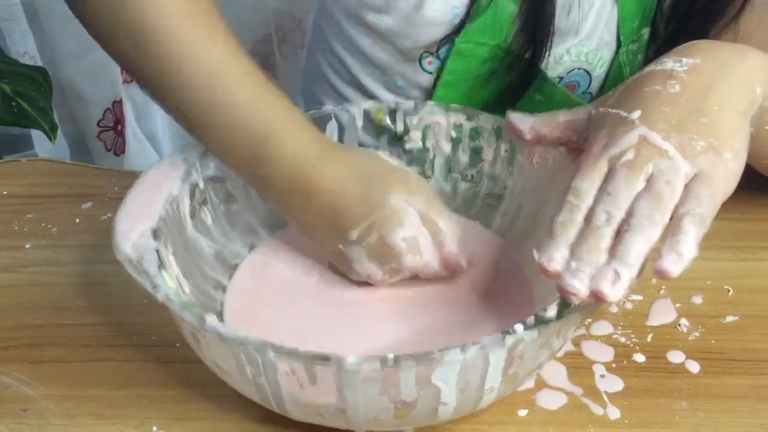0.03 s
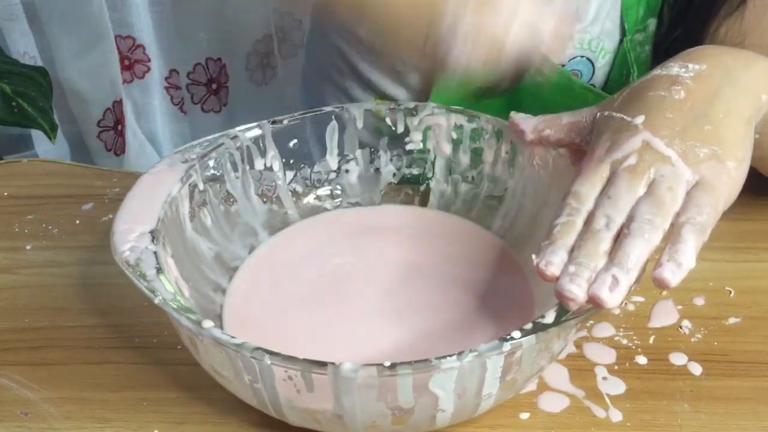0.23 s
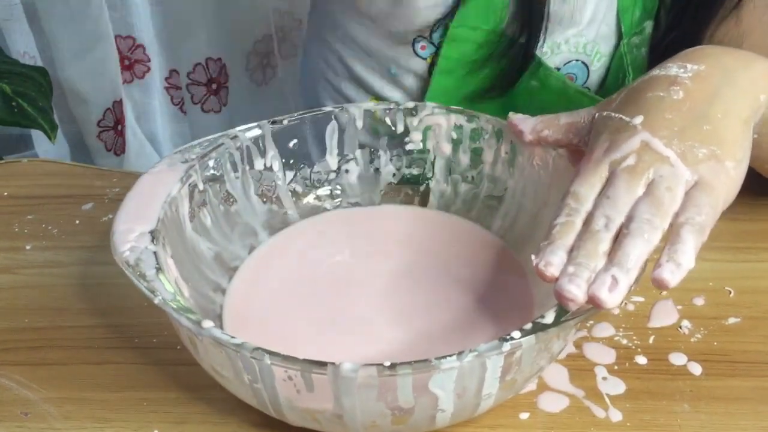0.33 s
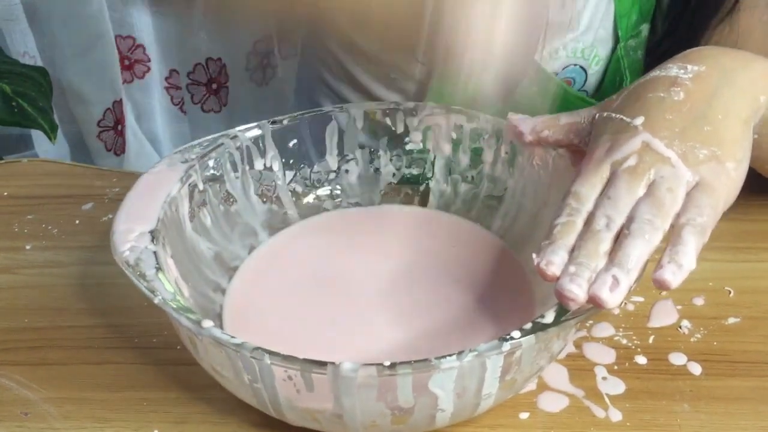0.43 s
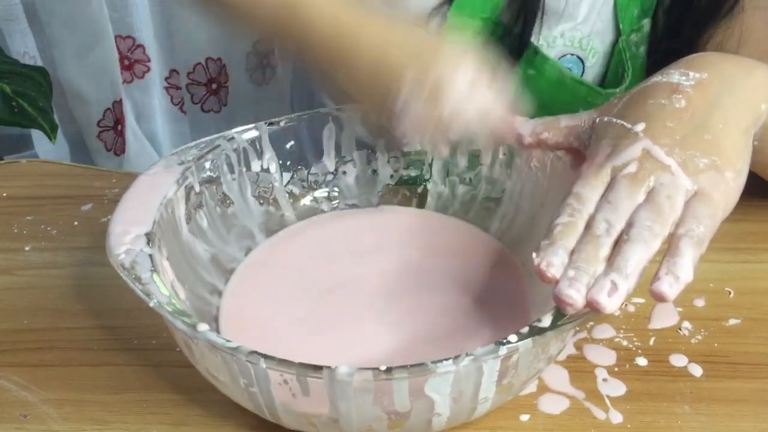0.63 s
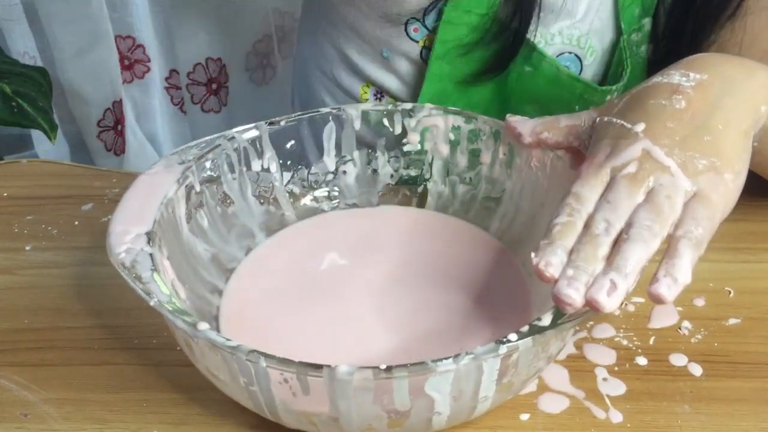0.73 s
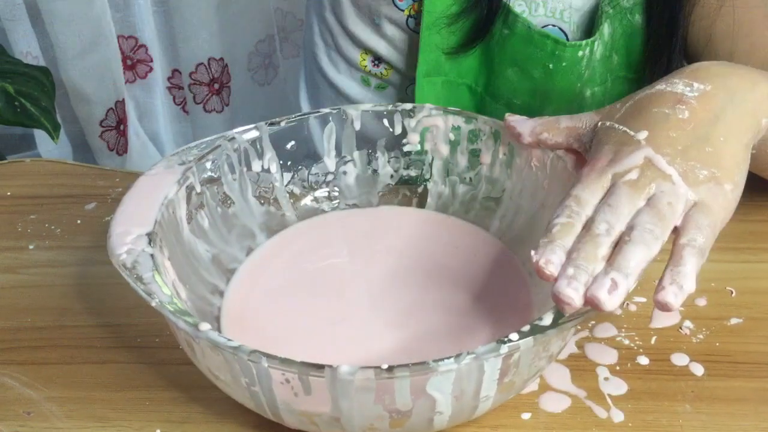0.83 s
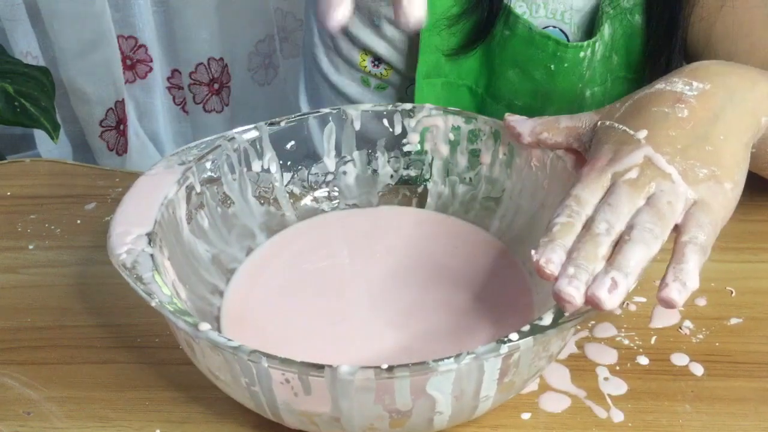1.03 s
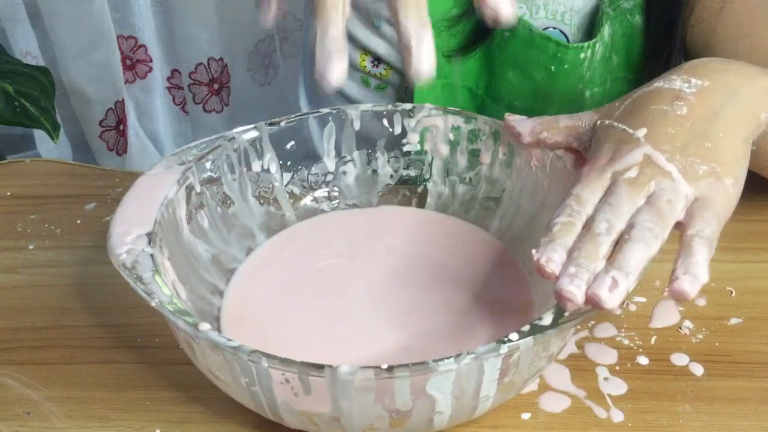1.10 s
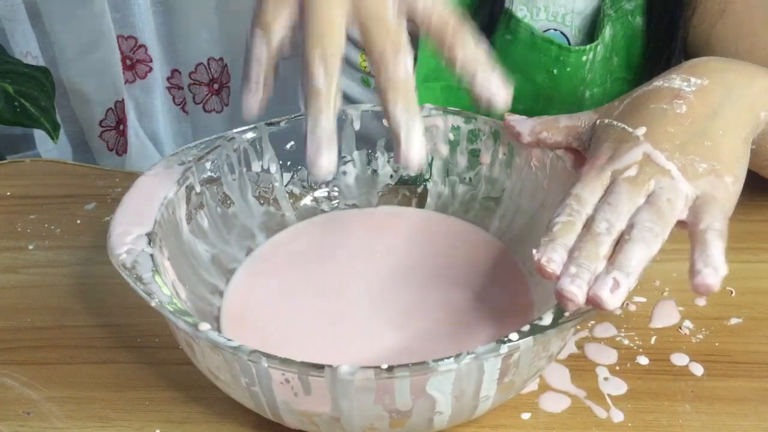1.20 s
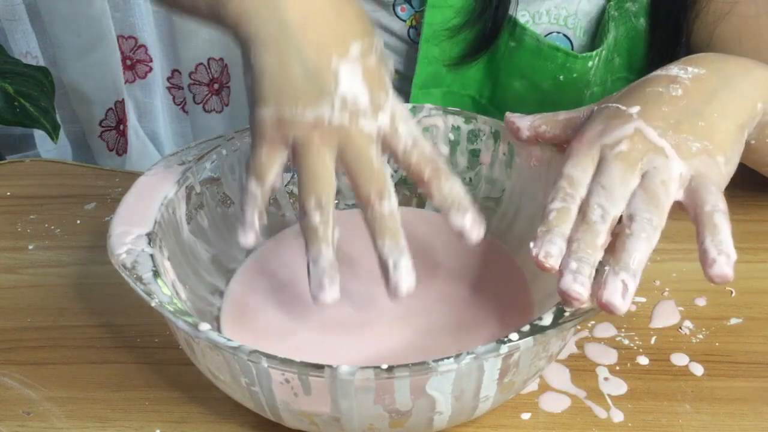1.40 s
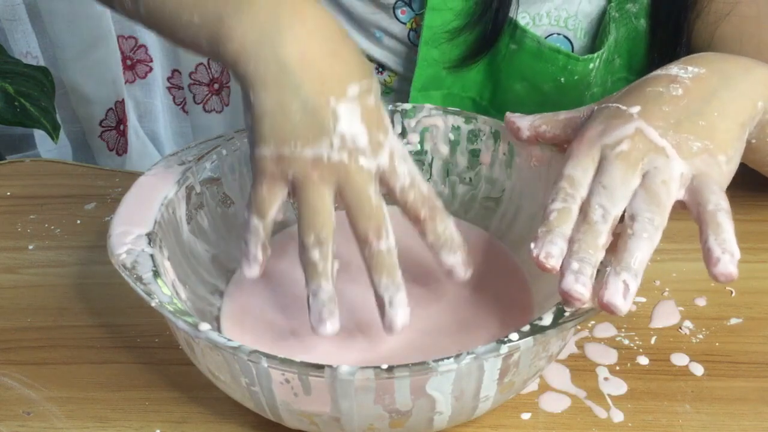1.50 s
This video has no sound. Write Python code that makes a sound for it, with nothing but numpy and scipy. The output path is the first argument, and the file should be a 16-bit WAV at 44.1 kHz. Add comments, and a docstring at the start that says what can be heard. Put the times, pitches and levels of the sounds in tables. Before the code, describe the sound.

Two quick, wet smacks on thick goo, close to the microphone in a small room. Each has a low thud and a short rattle of the glass bowl on a wooden table; the second cracks more sharply. Quiet follows.

```python
"""Slapping goo in a glass bowl

A small room, one microphone close to a bowl of thick goo on a wooden table. A hand strikes twice:
each blow is a wet slap, a pop of trapped air and a low push through the stiffened goo, and the bowl
rocks and knocks on the table. Tiny sticky ticks and soft nudges lie just over the quiet room tone."""
import sys
import numpy as np
from scipy import signal
from scipy.fft import rfft, irfft
from scipy.io import wavfile

SR = 44100
rng = np.random.default_rng(int(sys.argv[2]) if len(sys.argv) > 2 else 0)


def store_wav(level_fs):
    """Save 16-bit WAV to argv[1]."""
    pcm = np.round(np.clip(np.atleast_2d(level_fs), -1, 1) * 32767)
    wavfile.write(sys.argv[1], SR, pcm.T.astype(np.int16))


N = 68355
T = np.arange(SR // 2) / SR  # time within one sound [s]

# hand meets goo: (time [s], splat [dB], splat decay [s], air pop [dB], push [dB], squish [dB])
HAND_BLOWS = [(0.1957, -22.5, 0.002, -26, -14.5, -36), (0.628, -18, 0.0019, -0.5, -15, -33.5)]
# colour of the wet splat and squish: (frequency [Hz], level [dB])
SPLAT_SPECTRUM = [(300, -4.5), (1000, 2.5), (1500, 5), (3500, 0), (5500, -2.5), (9000, -8.5), (11000, -9),
                  (16000, -8)]
# air trapped under the hand pops: (frequency [Hz], level [dB], t60 [s])
POP_MODES = [(1830, -14.5, .018), (2101, -6, 0.013), (2428, -11.5, .012), (2650, -16, 0.02)]
# the pop's sharp edge: (frequency [Hz], level [dB])
CRACK_SPECTRUM = [(1000, -25.5), (3000, -6.5), (4300, -8), (6000, -3), (9000, 1), (10300, -20),
                  (12500, -11.5), (16000, -23)]
# the table shudders under a blow: (frequency [Hz], level [dB], t60 [s])
TABLE_MODES = [(54.13, -15, 0.2), (88.5, -16.5, 0.14), (277.3, 2, 0.042)]
# bowl meets table: (time [s], level [dB], treble cut [Hz], bass cut [Hz], contact [s])
BOWL_KNOCKS = [(.213, -9, 1200, 73.6, 0.0036), (.232, -7.5, 1460, 100, 0.0013),
               (.2502, -11.5, 1380, 446, 0.00062), (.259, -7.5, 318.6, 60.2, .002),
               (0.2652, -22, 3860, 293, 0.0033), (.643, -7.5, 1400, 70, 0.0053),
               (0.6618, -10.5, 1200, 70, 0.0013), (.6848, -12, 1180, 543, 0.00076),
               (0.6933, -16.5, 2420, 348, 0.0012), (0.696, -7, 290, 170, 0.0026)]
# bowl and table, damped by the goo: (frequency [Hz], level [dB], t60 [s])
BOWL_MODES = [(194.3, -9.5, 0.037), (229.6, -5, 0.064), (291.5, -0.5, .04), (375.1, -3, 0.035),
              (528, -8.5, .04), (647, -12.5, 0.066), (706.6, -8.5, 0.051), (739, -16.5, 0.056),
              (1004, -18, .03), (1387, -21, 0.045), (1936, -21.5, 0.078)]
# the grit in each knock: (frequency [Hz], level [dB])
SCRAPE_SPECTRUM = [(100, -5), (400, 6), (800, -2), (2000, -3.5), (3000, -9.5), (6000, -9.5), (15000, -33.5)]
# air pockets snap in the goo: (time [s], level [dB], pitch [Hz], t60 [s])
AIR_POCKETS = [(0.231, -25.5, 3500, 0.01), (0.2305, -20.5, 1740, 0.04), (0.2504, -27.5, 4580, 0.017),
               (.6622, -31, 2100, .025), (.6848, -36, 4650, 0.021), (0.6934, -19.5, 1966, 0.015),
               (0.6925, -20, 1446, 0.028)]
# soft nudges of the bowl: (time [s], level [dB], pitch [Hz])
BOWL_NUDGES = [(0, -53, 208), (0.069, -48, 111), (.172, -46, 170), (0.559, -52.5, 156), (0.602, -51, 108),
               (.86, -53, 225.6), (1.238, -49, 131.4), (1.525, -52, 60)]
# the goo lets go: (time [s], level [dB], pitch [Hz], width [Hz], rise [s])
STICKY_TICKS = [(0.189, -72, 10400, 9000, 0.0019), (0.281, -59, 10900, 7000, 0.0017),
                (0.287, -61, 11800, 7200, 0.0038), (0.313, -61, 12000, 6000, 0.00065),
                (0.878, -64.5, 4020, 12000, .0015), (0.895, -64, 5250, 350, 0.004),
                (1.115, -73, 14510, 2000, .004), (1.325, -67.5, 2155, 298.8, .007)]
# how long the room rings: (frequency [Hz], t60 [s])
ECHO_DECAY = [(60, 0.84), (210, 0.2229), (400, 0.14), (750, 0.2362), (1100, 0.16), (2500, 0.2437),
              (6000, 0.18), (15000, 0.23)]
# colour of the room's echo: (frequency [Hz], level [dB])
ECHO_SPECTRUM = [(60, -17.5), (130, -10), (220, -6.5), (300, -16), (500, -7.5), (730, -10.5), (1100, -8),
                 (2300, -18), (2900, -16.5), (3700, -8), (4700, -13), (8500, -21.5), (14000, -18)]
# steady room tone: (frequency [Hz], level [dB])
HUSH_SPECTRUM = [(15, -22.5), (28, -18.5), (45, 7), (65, -1), (130, 0.5), (180, -8.5), (300, -3.5),
                 (450, -14.5), (800, -16.5), (2000, -22.5), (5000, -31), (10000, -36.5), (16000, -41)]


def hand():
    """Each blow splats, pops the air under the hand and shoves the table, which gives and shudders."""
    slap_rise_s, pop_delay_s, pop_band_hz = 0.0012, 0.00044, [1700, 3140]
    push_hz, push_peak_s, shudder_delay_s = 85, 0.0112, 0.0016
    swing = (np.pi * push_hz * (T - push_peak_s)) ** 2
    onset = np.sin(np.pi / 2 * ramp(push_peak_s)) ** 2
    heave = (1 - 2 * swing) * np.exp(-swing) * onset  # one slow swing of the table
    shudder = ring(TABLE_MODES) * ramp(rise_s=0.0017)
    pop = signal.sosfilt(signal.butter(4, pop_band_hz, "band", fs=SR, output="sos"), ring(POP_MODES))
    out = np.zeros(N)
    for s, splat_db, decay_s, pop_db, push_db, squish_db in HAND_BLOWS:
        add(out, s, amp(splat_db) * burst(SPLAT_SPECTRUM, slap_rise_s, decay_s))
        add(out, s, amp(squish_db) * squish())
        add(out, s, amp(pop_db - 7.5) * burst(CRACK_SPECTRUM, slap_rise_s, decay_s=0.00041))
        add(out, s + pop_delay_s, amp(pop_db) * pop)
        add(out, s, amp(push_db) * heave)
        add(out, s + shudder_delay_s, amp(push_db) * shudder)
    return out


def squish(crackles_per_s=7800, spread_db=1.5, decay_s=0.022):
    """Tiny wet crackles as the goo spreads under the hand."""
    sizes = amp(spread_db * np.minimum(rng.exponential(1, len(T)), 4))
    signs = rng.choice([-1, 1], len(T))
    fires = rng.random(len(T)) < crackles_per_s / SR
    return coloured(sizes * signs * fires, SPLAT_SPECTRUM) * np.exp(-T / decay_s)


def bowl():
    """The bowl rocks on the table: hard edge contacts are bright and thin, flat ones dull and heavy."""
    out = np.zeros(N)
    for s, db, treble_hz, bass_hz, contact_s in BOWL_KNOCKS:
        body = ring(BOWL_MODES) * ramp(contact_s)
        grit = amp(-8.5) * burst(SCRAPE_SPECTRUM, contact_s, decay_s=0.005)
        dulled = cut(body + grit, treble_hz, "low")
        add(out, s, amp(db) * cut(dulled, bass_hz, "high"))
    return out


def pockets():
    """Air pockets snap as the goo is jolted: each a very short ring with a weaker, higher partner."""
    out = np.zeros(N)
    for s, db, hz, t60 in AIR_POCKETS:
        snap = ring([(hz, db, t60), (hz * 1.1, db - 14.5, t60)])
        add(out, s, snap * ramp(rise_s=2 / hz))
    return out


def nudges():
    """The bowl is softly nudged: faint, low bumps of one pitch each."""
    out = np.zeros(N)
    for s, db, hz in BOWL_NUDGES:
        add(out, s, amp(db) * swell(rise_s=0.01) * np.sin(2 * np.pi * hz * T))
    return out


def ticks():
    """Sticky goo lets go in tiny ticks, each a band of noise."""
    out = np.zeros(N)
    freqs = np.fft.rfftfreq(len(T), 1 / SR)
    for s, db, hz, width_hz, rise_s in STICKY_TICKS:
        band = np.exp(-((freqs - hz) / width_hz) ** 2)
        fizz = unit_rms(irfft(rfft(rng.standard_normal(len(T))) * band, len(T)))
        add(out, s, amp(db) * swell(rise_s) * fizz)
    return out


def room_echo(near, delay_s=0.0065, wall_delay_s=0.058):
    """Dense reflections, each band dying at its own speed, and one dull return from the far wall."""
    hz, t, reflections = signal.stft(rng.choice([-1., 1.], len(T)), SR, nperseg=512)
    t60 = read(ECHO_DECAY, hz)[:, None]
    colour = amp(read(ECHO_SPECTRUM, hz))[:, None]
    decay = np.exp(-np.log(1000) * t / t60)
    unit_energy = np.sqrt(2 * np.log(1000) / (t60 * SR))
    response = signal.istft(reflections * colour * decay * unit_energy, SR, nperseg=512)[1]
    wall = cut(cut(near, hz=260, kind="low"), hz=130, kind="high")
    out = np.zeros(N)
    add(out, wall_delay_s, amp(-17.5) * wall)
    add(out, delay_s, signal.fftconvolve(near, response))
    return out


def room_tone():
    """The room's steady, low hush."""
    return amp(-59) * coloured(rng.standard_normal(N), HUSH_SPECTRUM)


def amp(db):
    """Decibels to gain."""
    return 10 ** (np.asarray(db) / 20)


def unit_rms(x):
    """Scales to rms 1."""
    return x / np.sqrt(np.mean(x ** 2) + 1e-20)


def read(points, hz):
    """Reads a table on a log-frequency axis."""
    freqs, values = np.transpose(points)
    return np.interp(np.log(hz + 1), np.log(freqs + 1), values)


def add(mix, s, sound):
    """Mixes a sound in at time s."""
    part = mix[max(round(s * SR), 0):][:len(sound)]
    part += sound[:len(part)]


def coloured(noise, spectrum):
    """Gives a noise a spectrum, at rms 1."""
    gains = amp(read(spectrum, np.fft.rfftfreq(len(noise), 1 / SR)))
    return unit_rms(irfft(rfft(noise) * gains, len(noise)))


def cut(x, hz, kind):
    """Gentle low-pass or high-pass."""
    return signal.sosfilt(signal.butter(2, hz, kind, fs=SR, output="sos"), x)


def ramp(rise_s):
    """Rises straight to 1 and holds."""
    return np.minimum(T / rise_s, 1)


def swell(rise_s):
    """Rises to a rounded peak of 1 and dies away."""
    return T / rise_s * np.exp(1 - T / rise_s)


def ring(modes):
    """Dying sines of a struck thing."""
    return sum(amp(db) * np.exp(-np.log(1000) * T / t60) * np.sin(2 * np.pi * hz * T)
               for hz, db, t60 in modes)


def burst(spectrum, rise_s, decay_s):
    """A short puff of coloured noise."""
    envelope = ramp(rise_s) * np.exp(-np.maximum(T - rise_s, 0) / decay_s)
    return coloured(rng.standard_normal(len(T)), spectrum) * envelope


def scene():
    """Hand, bowl and goo close to the microphone, the small room behind them, in mono."""
    near = hand() + bowl() + pockets() + nudges() + ticks()
    return (near + room_echo(near) + room_tone())[None]


def record(dry):
    """The microphone's bass roll-off, clipping, then the band limit."""
    bass_hz, full_scale, top_hz = 30, 0.9, 16000
    clipped = np.clip(cut(dry, bass_hz, "high"), -full_scale, full_scale)
    band_limit = signal.firwin(255, top_hz, window=("kaiser", 9), fs=SR)
    return signal.oaconvolve(clipped, band_limit[None], "same")


dry = scene()
out = record(dry)
store_wav(out)
```